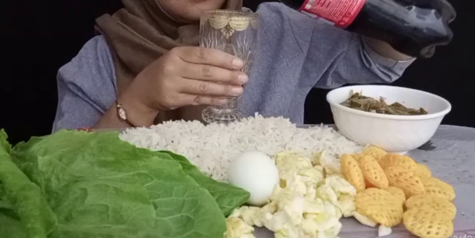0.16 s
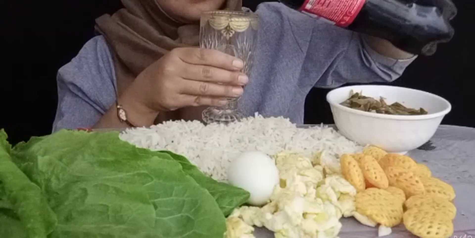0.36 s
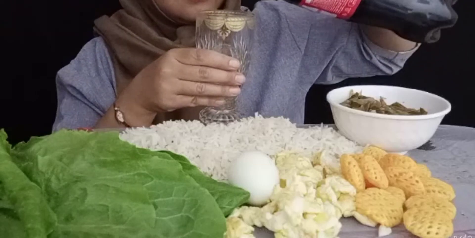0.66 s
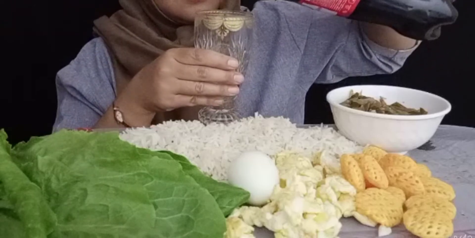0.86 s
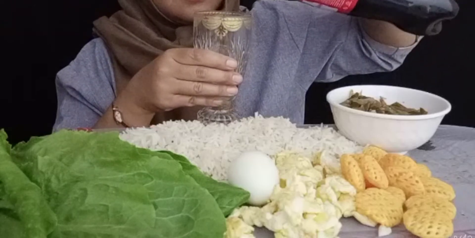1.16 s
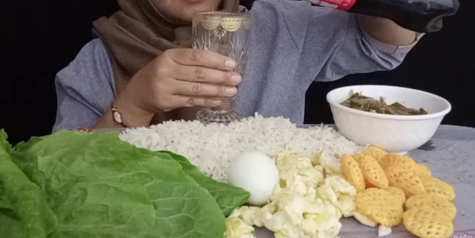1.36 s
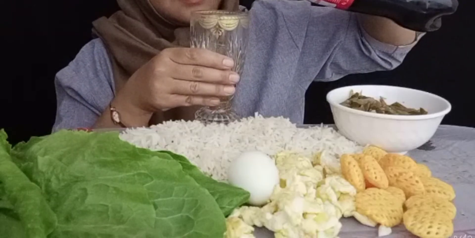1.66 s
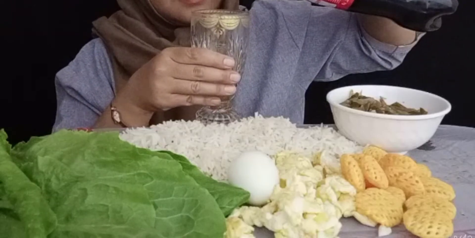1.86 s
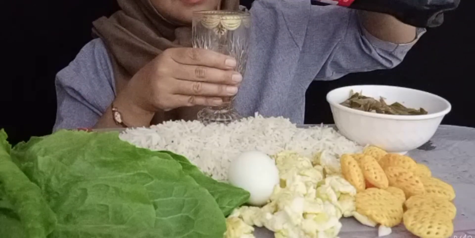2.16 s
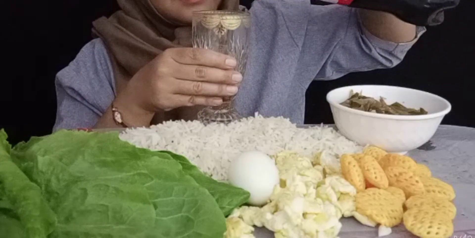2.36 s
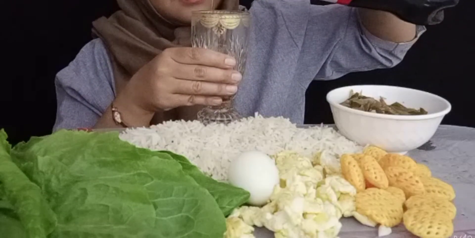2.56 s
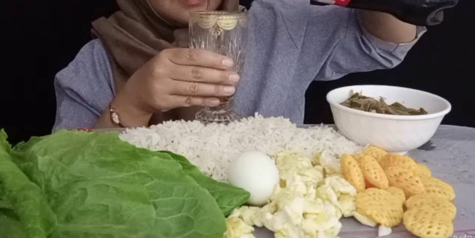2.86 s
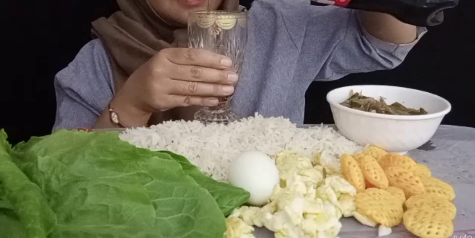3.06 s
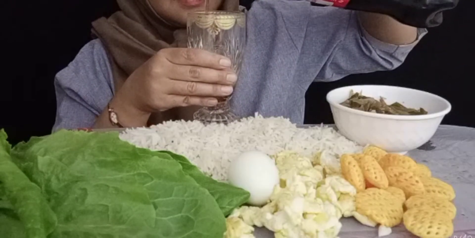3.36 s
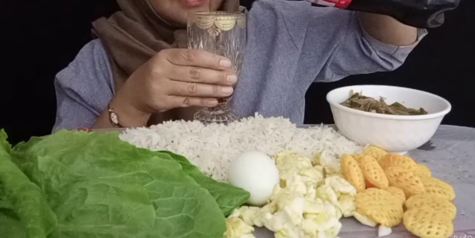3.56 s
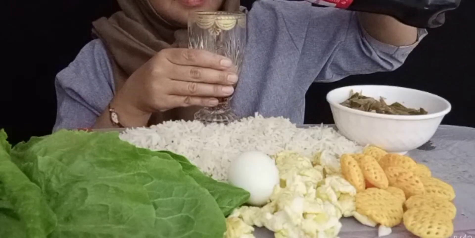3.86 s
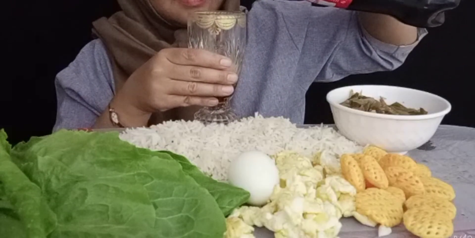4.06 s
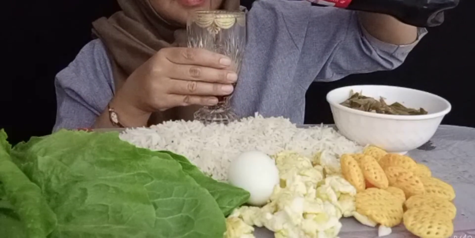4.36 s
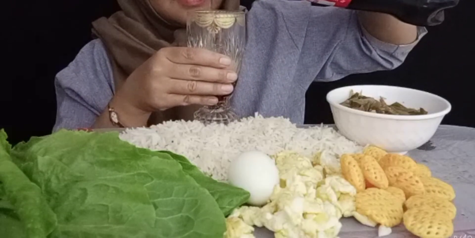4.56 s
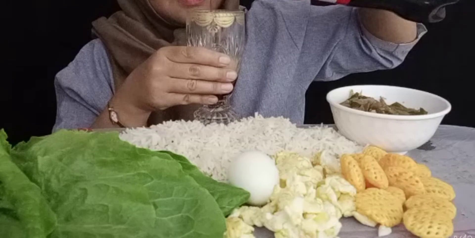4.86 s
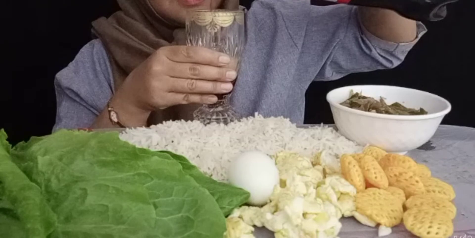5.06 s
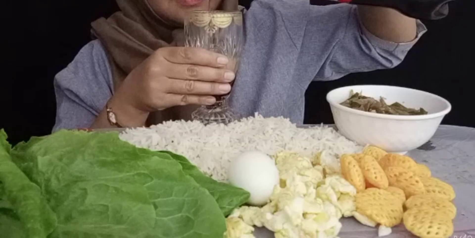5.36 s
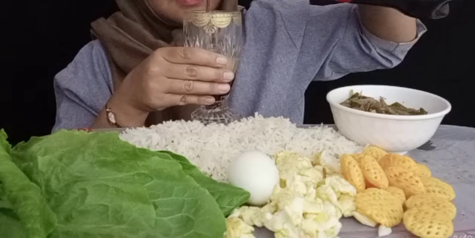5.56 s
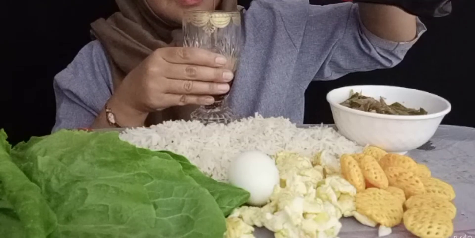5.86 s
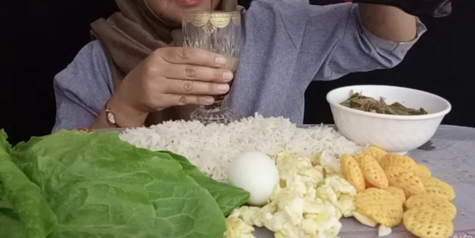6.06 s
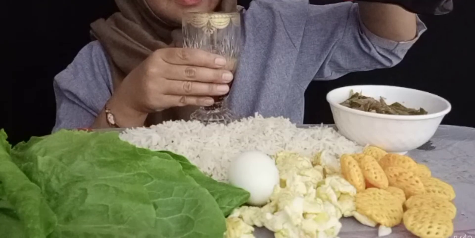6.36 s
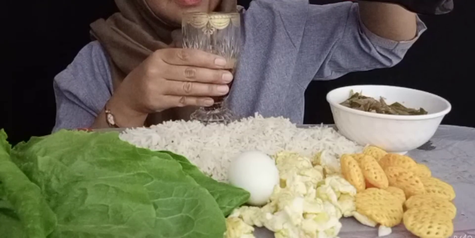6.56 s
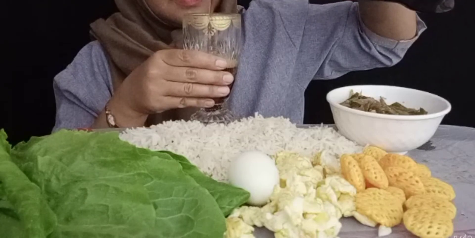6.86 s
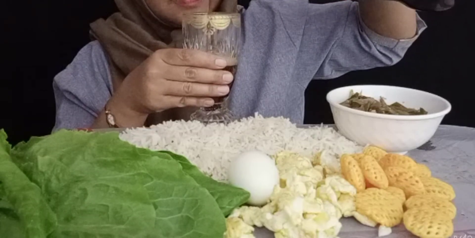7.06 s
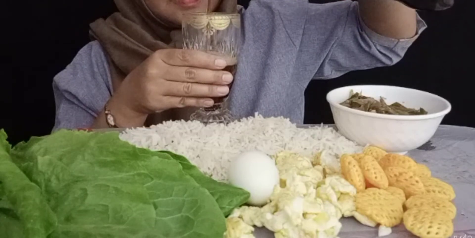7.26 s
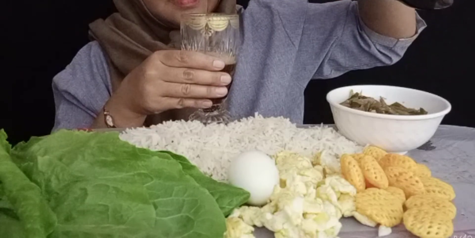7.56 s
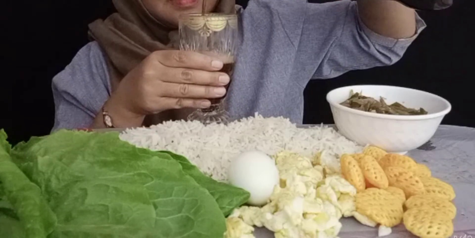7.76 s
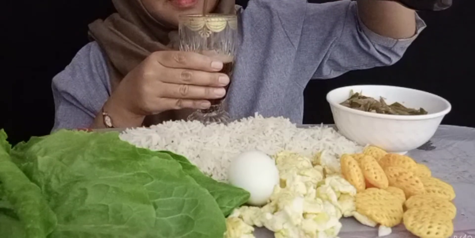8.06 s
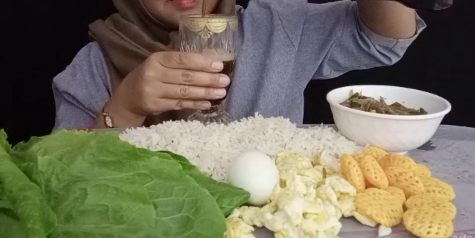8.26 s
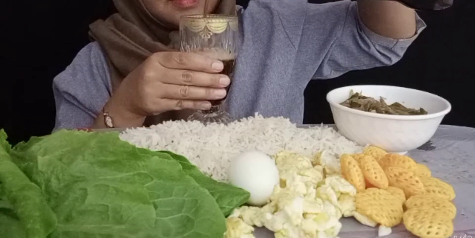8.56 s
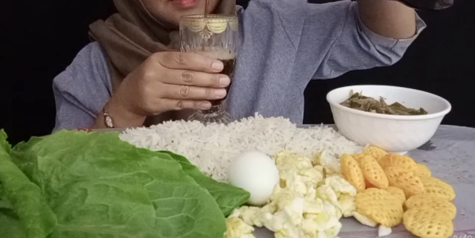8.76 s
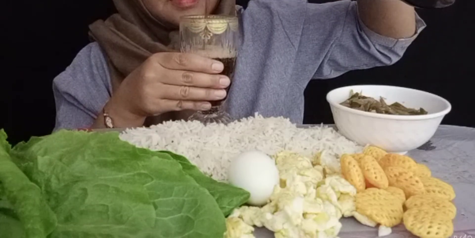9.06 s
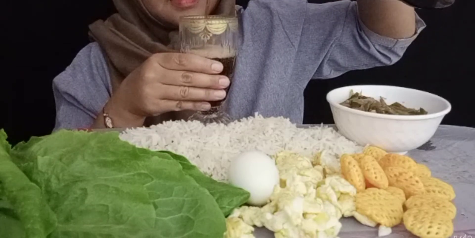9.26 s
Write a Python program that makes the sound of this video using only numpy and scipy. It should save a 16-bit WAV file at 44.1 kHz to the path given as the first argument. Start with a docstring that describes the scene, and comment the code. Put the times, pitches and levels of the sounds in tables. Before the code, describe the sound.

After faint plastic ticks, soda splashes into a tall glass and settles into bright fizzing with soft gulps.

```python
"""A low hum throbs in a small room and a plastic bottle ticks; then a fizzy drink pours into a tall glass.
Drops and slugs of liquid ring the air column, which rises in pitch as the glass fills. The bottle gulps,
the foam fizzes with bursting bubbles, the glass rings faintly and two larger bubbles chirp near the end.
A wall answers each splash and tick. The microphone is close and mono."""
import sys
import numpy as np
from scipy import signal
from scipy.fft import rfft, irfft, next_fast_len
from scipy.io import wavfile
from scipy.ndimage import uniform_filter1d, map_coordinates

SR = 44100
rng = np.random.default_rng(int(sys.argv[2]) if len(sys.argv) > 2 else 0)


def to_wav(s):
    """Save 16-bit WAV."""
    ch = np.atleast_2d(s).T  # columns
    pcm = np.round(np.clip(ch, -1, 1) * 32767)  # PCM
    wavfile.write(sys.argv[1], SR, pcm.astype(np.int16))


N = 415422
TIME_S = np.arange(N) / SR


def amp(db):
    return 10 ** (np.asarray(db) / 20)


def unit(x):
    return x / np.sqrt(np.mean(x ** 2) + 1e-20)


def add_power(*levels_db):
    return 10 * np.log10(sum(amp(db) ** 2 for db in levels_db))


def along(points, hz):
    """Interpolate (Hz, value) points on a log axis."""
    f, v = np.transpose(points)
    return np.interp(np.log(hz + 1), np.log(f + 1), v)


def curves(rows, before=None):
    """One value per sample for each column after the time."""
    s, *cols = np.transpose(rows)
    return [np.interp(TIME_S, s, c, left=before) for c in cols]


def wobble(rate_hz):
    """Smooth random curve, rate_hz knots a second."""
    coarse = np.arange(0, N + 32, 32)
    knots = rng.standard_normal(int(N * rate_hz / SR) + 4)
    return np.interp(np.arange(N), coarse, map_coordinates(knots, [coarse * rate_hz / SR]))


def filtered(x, response):
    """x times a complex response of frequency."""
    m = next_fast_len(N + SR // 2)
    return irfft(rfft(x, m) * response(np.fft.rfftfreq(m, 1 / SR)), m)[..., :N]


def coloured(x, points):
    """x through a (Hz, dB) spectrum, rms 1."""
    return unit(filtered(x, lambda hz: amp(along(points, hz))))


def mode(f, hz, width_hz):
    """Causal resonance, peak 1."""
    return 1j * f * width_hz / (hz * hz - f * f + 1j * f * width_hz + 1e-9)


def pops(rate_hz, spread_db, noise):
    """Random clicks on a share of plain noise, rms 1."""
    chance, polarity, size = rng.random((3, N))
    clicks = (chance < rate_hz / SR) * np.sign(polarity - .5) * amp(-spread_db * np.log(size + 0.17))
    return unit(unit(clicks) + noise * rng.standard_normal(N))


def bursts(rows, shapes):
    """Per level column, the summed dB of all events under that column's envelope."""
    power = np.full((len(shapes), N), 1e-12)
    for s, *levels_db in rows:
        near = slice(max(round(s * SR) - SR // 2, 0), round(s * SR) + SR // 2)
        power[:, near] += [(amp(db) * shape(TIME_S[near] - s)) ** 2
                           for db, shape in zip(levels_db, shapes)]
    return 10 * np.log10(power)


# Hum bands, upper first. Each row: centre in Hz, width in Hz.
HUM_BANDS = [(112.6, 17.5), (84.2, 21)]
# Hum swells. Each row: centre in seconds, upper band in dB, lower band in dB.
THROBS = [(.06, -49, -72), (.31, -47, -63), (.57, -51.5, -66), (1.27, -57, -68), (1.6, -54, -65),
          (2.03, -57, -70), (2.48, -50.5, -56), (3.41, -55.5, -55), (6.32, -56, -71), (6.66, -54, -54.5),
          (7.35, -59, -74), (8.22, -52.5, -64), (8.4, -55, -77), (8.83, -66, -55), (9.4, -67, -54)]


def hum(steady_db=(-64.5, -67), throb_sigma_s=0.043):
    """Two narrow bands of low noise waver and throb."""
    throbs_db = bursts(THROBS, 2 * [lambda t: np.exp(-.5 * (t / throb_sigma_s) ** 2)])
    out = np.zeros(N)
    for (hz, width_hz), db, throb_db in zip(HUM_BANDS, steady_db, throbs_db):
        band = unit(filtered(rng.standard_normal(N), lambda f: mode(f, hz, width_hz) ** 2))
        evened = unit(band / uniform_filter1d(band ** 2, size=SR // 16) ** 0.38)
        out += amp(add_power(db + 3 * wobble(4.6), throb_db)) * evened
    return out


# Room noise spectrum. Each row: frequency in Hz, relative level in dB.
AIR_SPECTRUM = [(60, -32), (150, -21.5), (260, -19.5), (520, -28.5), (1200, -31), (2700, -34),
                (4000, -38.5), (7500, -41), (9000, -49), (13700, -72), (14400, -35), (15800, -56)]


def room_noise(air_db=-64.5, rumble_db=-74.5):
    """Faint steady hiss over a deep rumble."""
    colour = lambda f: amp(along(AIR_SPECTRUM, f)) * np.clip(f / 150, 0, 1) ** 3
    air = unit(filtered(rng.standard_normal(N), colour))
    rumble = coloured(rng.standard_normal(N), [(20, -33), (50, 7), (70, 2), (90, -35)])
    return amp(air_db) * air + amp(rumble_db) * rumble


# Modes of the plastic. Each row: frequency in Hz, width in Hz, gain in dB.
BOTTLE_MODES = [(3540, 690, -0.5), (4330, 690, -3.5), (4780, 730, -2.5), (5580, 500, -6.5),
                (6070, 370, -5.5), (7600, 1300, 1.5), (10700, 2500, -1.5), (14900, 2500, 0)]
# Bottle ticks. Each row: start in seconds, level in dB, centre in Hz, reach in octaves.
TICKS = [(.071, -46, 5500, .15), (0.0752, -38.5, 5230, 0.56), (.085, -43, 6100, 0.33),
         (0.561, -36, 5450, 0.11), (.574, -31.5, 4300, .1), (0.583, -40, 5200, 0.13),
         (8.922, -33, 13500, 0.4)]


def bottle_ticks():
    """Each tick rings the modes of the plastic near its pitch, roughly and briefly."""
    out, t = np.zeros(N), np.arange(SR // 20) / SR
    for s, db, centre_hz, reach_oct in TICKS:
        for hz, width_hz, mode_db in BOTTLE_MODES:
            grit = uniform_filter1d(1 + 0.67 * rng.standard_normal(len(t)), size=25)
            envelope = np.e * np.pi * width_hz * t * np.exp(-np.pi * width_hz * t)
            gain = amp(db + mode_db) * np.exp(-.5 * (np.log2(hz / centre_hz) / reach_oct) ** 2)
            out[round(s * SR):][:len(t)] += gain * envelope * grit * np.sin(2 * np.pi * hz * t)
    return out


WALL_DELAY_S = .0095
# Echo against the direct path, whose treble the rim shades. Each row: frequency in Hz, gain in dB.
WALL_COLOUR = [(300, -5), (1000, -7.5), (2500, 2.5), (7000, 5.5), (15000, -10.5)]


def wall_echo(x, trim_db=-0.9, smear_t60_s=.0008):
    """One strong, bright echo, spread a little by the rough wall."""
    scatter = rng.standard_normal(SR // 200) * amp(-60 * np.arange(SR // 200) / SR / smear_t60_s)
    smeared = signal.fftconvolve(x, scatter / np.linalg.norm(scatter))[:N]
    colour = lambda f: amp(trim_db + along(WALL_COLOUR, f))
    return filtered(smeared, lambda f: colour(f) * np.exp(-2j * np.pi * f * WALL_DELAY_S))


# Room decay. Each row: frequency in Hz, T60 in seconds.
ROOM_T60 = [(300, 0.26), (1000, 0.27), (4000, 0.23), (12000, 0.074)]


def room_tail(x, gap_s):
    """The diffuse tail starts after a gap; each frequency dies at its own speed."""
    hz, t, spectra = signal.stft(rng.standard_normal(SR // 2), SR, nperseg=256)
    decay_db = along(WALL_COLOUR, hz)[:, None] / 2 - 60 * t / along(ROOM_T60, hz)[:, None]
    tail = signal.istft(spectra * amp(decay_db), SR, nperseg=256)[1]
    return signal.fftconvolve(np.pad(x, (round(gap_s * SR), 0)), tail / np.linalg.norm(tail))[:N]


# Steady pour. Each row: time in seconds, burble in dB, spatter in dB, fizz in dB.
POUR = [(.68, -64, -69, -68), (.77, -60, -51, -59), (.87, -79, -63, -56), (1.04, -61, -56.5, -55),
        (1.17, -47, -55, -46), (1.63, -57, -46.5, -51), (1.87, -49, -51, -49), (2.13, -60, -51.5, -49),
        (2.33, -43.5, -47.5, -49), (2.55, -51.5, -51, -47), (3.2, -50.5, -60.5, -48.5),
        (3.82, -58, -64.5, -49), (4.1, -50.5, -67, -49), (4.4, -63, -66.5, -48.5), (4.77, -51, -64, -47.5),
        (5.08, -58, -65, -48.5), (5.8, -52.5, -65, -47), (7.0, -51, -62, -47.5), (8.13, -49, -63, -46),
        (8.8, -55.5, -62, -47), (9.42, -52.5, -64, -49.5)]


def pour_levels(slosh_under_db=11):
    """Burble, spatter, slosh and fizz in dB: the steady pour plus splashes and gulps."""
    burble_db, spatter_db, fizz_db = curves(POUR, before=-120)
    splash_spatter_db, splash_slosh_db, splash_fizz_db = splashes()
    gulp_burble_db, gulp_slosh_db = gulps()
    return (add_power(burble_db, gulp_burble_db),
            add_power(spatter_db, splash_spatter_db),
            add_power(spatter_db - slosh_under_db, splash_slosh_db, gulp_slosh_db),
            add_power(fizz_db, splash_fizz_db))


# Air column, damped more as foam builds. Each row: time in seconds, pitch in Hz, width in Hz.
AIR_COLUMN = [(.7, 856, 94), (2.5, 931, 130), (4.5, 982, 144), (6.5, 1051, 172), (8.3, 1152, 188),
              (8.8, 1240, 170), (9.4, 1315, 190)]
NECK_HZ, NECK_WIDTH_HZ, NECK_DB = 976, 130, -1.1  # steady ring, perhaps the bottle neck
BRIM_HZ, BRIM_WIDTH_HZ, BRIM_DB, BRIM_FADE_IN_S = 1625, 138, -3, (8, 9)  # joins when nearly full


def burble(level_db, wander_s=.35):
    """Small impacts ring the air column, cross-faded between its stages of filling."""
    kicks = pops(rate_hz=150, spread_db=1, noise=0.59) * amp(2.5 * wobble(30))
    filling_s = TIME_S + wander_s * wobble(12)  # the foam heaves
    neck = unit(filtered(kicks, lambda f: mode(f, NECK_HZ, NECK_WIDTH_HZ) * mode(f, NECK_HZ, 155)))
    brim = unit(filtered(kicks, lambda f: mode(f, BRIM_HZ, BRIM_WIDTH_HZ) ** 2))
    out = amp(NECK_DB) * neck + amp(BRIM_DB) * np.interp(TIME_S, BRIM_FADE_IN_S, [0, 1]) * brim
    times_s = [row[0] for row in AIR_COLUMN]
    for stage, (_, hz, width_hz) in zip(np.eye(len(AIR_COLUMN)), AIR_COLUMN):
        # soft impacts leave steep skirts
        ring = filtered(kicks, lambda f: mode(f, hz, width_hz) * mode(f, hz, 544) ** 2)
        out += np.sqrt(np.interp(filling_s, times_s, stage)) * unit(ring)
    running_rms = np.sqrt(uniform_filter1d(out ** 2, size=SR // 8) + 1e-9)
    return out / running_rms * amp(level_db)


# Spatter spectrum. Each row: frequency in Hz, relative level in dB.
SPATTER_SPECTRUM = [(1100, -34), (1500, -9), (2000, -8), (2500, -4.5), (2850, -4.5), (3200, -10),
                    (4200, -8), (6500, -19), (10000, -44), (13000, -85), (15500, -5)]


def spatter(level_db):
    """The stream patters densely on the surface."""
    impacts = pops(rate_hz=990, spread_db=0, noise=0.82)
    return coloured(impacts, SPATTER_SPECTRUM) * amp(level_db + 2.7 * wobble(14))


# Slosh spectrum. Each row: frequency in Hz, relative level in dB.
SLOSH_SPECTRUM = [(150, -16), (290, 5), (360, 8.5), (430, 2), (525, 11), (600, -1), (720, 5.5), (1000, -29)]


def slosh(level_db):
    """The liquid sloshes, low and uneven."""
    slaps = pops(rate_hz=86, spread_db=9.5, noise=0.99)
    return coloured(slaps, SLOSH_SPECTRUM) * amp(level_db + 4.2 * wobble(22))


def bubbles(count, middle_hz, spread, cycles, samples):
    """Single bubbles: soft-starting damped sines that rise in pitch, rms 1."""
    position, smallness = rng.random((2, count, 1))
    hz = np.clip(middle_hz * np.exp(spread * rng.standard_normal((count, 1))), 900, 15000)
    t = np.arange(samples) / SR
    age = hz * t / cycles
    envelope = amp(-3 * np.log(smallness + 0.23)) * np.exp(-age) * (1 - np.exp(-6 * age))
    pings = envelope * np.sin(2 * np.pi * hz * t * (1 + 0.26 * age / cycles))
    index = (position * N).astype(int) + np.arange(samples)
    return unit(np.bincount(index.ravel(), pings.ravel())[:N])


def patches(x, blot_db, streak_db):
    """x under random gains: blots of some 500 Hz by 35 ms, streaks of 170 Hz by 200 ms."""
    spectra = signal.stft(x, nperseg=512)[2]

    def field(bins, frames):
        noise = uniform_filter1d(rng.standard_normal(spectra.shape), size=bins, axis=0)
        return unit(uniform_filter1d(noise, size=frames, axis=1))

    gain_db = blot_db * field(bins=6, frames=6) + streak_db * field(bins=2, frames=34)
    return signal.istft(spectra * amp(gain_db), nperseg=512)[1][:N]


# Fizz spectrum. Each row: frequency in Hz, relative level in dB.
FIZZ_SPECTRUM = [(820, -25), (1400, -22), (1630, -18), (2140, -38), (2730, -47), (2940, -20), (3150, -1.5),
                 (4190, -4.5), (4920, -3.5), (5730, -1), (6410, 6.5), (7540, 5), (11900, -23), (13400, -22),
                 (15800, -4)]
# Colour of the glass. Each row: centre in Hz, width in Hz, gain in dB.
GLASS_COLOUR = [(4140, 94, -9.5), (4870, 1200, 3.5), (5610, 204, -7.5)]
# A ring of the glass that wakes as foam builds. Each row: time in seconds, gain on the hiss in dB.
SHEEN = [(1.5, -10), (3.3, 5), (3.6, 4), (4.4, 3), (6.4, 8), (7.3, 5.5), (8.0, 10), (8.7, 0), (9.2, 9)]
SHEEN_HZ, SHEEN_WIDTH_HZ = 3140, 200


def foam(level_db):
    """Thousands of tiny bubbles burst as a patchy hiss, larger ones ping; the glass colours both."""
    hiss = pops(rate_hz=3300, spread_db=8, noise=1.5)
    pings = amp(-13) * bubbles(count=6000, middle_hz=4496, spread=.6, cycles=17.3, samples=SR // 50)
    sparkle = amp(-12) * bubbles(count=2500, middle_hz=5994, spread=.35, cycles=47.5, samples=SR // 30)
    glass_db = lambda f: sum(db * abs(mode(f, hz, width)) ** 2 for hz, width, db in GLASS_COLOUR)
    fizz = filtered(hiss + pings + sparkle, lambda f: amp(along(FIZZ_SPECTRUM, f) + glass_db(f)))
    sheen = filtered(fizz, lambda f: abs(mode(f, SHEEN_HZ, SHEEN_WIDTH_HZ)) ** 2)
    fizz += (amp(curves(SHEEN)[0] + 3.3 * wobble(5.8)) - 1) * sheen
    patchy = unit(patches(fizz, blot_db=1.1, streak_db=2.24))
    return patchy * amp(level_db + 0.62 * wobble(9) + 0.4 * wobble(40))


# Thin rings of the glass wall. Each row: frequency in Hz, width in Hz, gain in dB.
GLASS_MODES = [(1966, 15, 0.5), (2384, 18, 1), (2760, 16.7, 2.5), (1680, 20, -10)]


def glass_ring(pour, fizz_db, struck_db=1.5, under_fizz_db=23):
    """Splashes and bubbles bursting at its wall set the glass ringing; each ring comes and goes."""
    modes = lambda f: np.array([amp(db) * mode(f, hz, width) for hz, width, db in GLASS_MODES])
    bursting = pops(rate_hz=25, spread_db=10.5, noise=0.12) * amp([5 * wobble(3) for _ in GLASS_MODES])
    taps = unit(filtered(bursting, modes).sum(axis=0)) * amp(fizz_db - under_fizz_db)
    return amp(struck_db) * filtered(pour, lambda f: modes(f).sum(axis=0)) + taps


# Echo between table and microphone stand: delay in seconds, then rows.
# Each row: frequency in Hz, share kept.
FLUTTER = (0.0025, [(800, 0.033), (1200, 0.026), (2500, 0.031), (3400, 0.33), (5000, 0.14), (8000, 0.17)])
# Inverted bounce off something nearer than the wall. Each row: frequency in Hz, share kept.
BOUNCE = [(600, 0.02), (1100, 0.062), (1900, 0.52), (2800, 0.12), (3400, .02)]
# Colour of the path over the table. Each row: centre in Hz, width in Hz, gain in dB.
TABLE_COLOUR = [(760, 160, -5), (1235, 70, 5), (1400, 160, -5), (3560, 150, -5)]


def table_path(x, bounce_s=.00773):
    """A short repeating echo and a single bounce draw combs on the colour of the path."""
    delay_s, kept = FLUTTER

    def response(f):
        comb = 1 / (1 - along(kept, f) * np.exp(-2j * np.pi * f * delay_s))
        bounce = 1 - along(BOUNCE, f) * np.exp(-2j * np.pi * f * bounce_s)
        bells = [1 + (amp(db) - 1) * mode(f, hz, width) for hz, width, db in TABLE_COLOUR]
        return comb * bounce * np.prod(bells, axis=0)

    return filtered(x, response)


def splash_shape(rise_s, t60_s):
    """Quick rise, even fall, peak 1."""
    raw = lambda t: (1 - np.exp(-t / rise_s)) * amp(-60 * t / t60_s)
    peak = raw(np.arange(SR // 4) / SR).max()
    return lambda t: raw(np.maximum(t, 0)) / peak


# Splashes. Each row: start in seconds, then peak spatter, slosh and fizz in dB.
SPLASHES = [(.69, -57, -82, -48.5), (.803, -38.5, -56.5, -68), (.875, -45, -75.5, -48),
            (.943, -50.5, -64, -62), (1.085, -39.5, -44, -29.5), (1.19, -41, -43, -51),
            (1.29, -37, -56, -45), (1.36, -64, -53, -44), (1.405, -50, -42.5, -40), (1.448, -48, -44, -38),
            (1.585, -47, -42, -64), (1.84, -48, -53, -48.5), (1.942, -39, -57, -47.5),
            (2.015, -44, -45, -63), (2.195, -39, -52, -44), (2.31, -54, -45, -52), (2.432, -41.5, -50, -47),
            (2.74, -61, -61, -44), (2.96, -53, -77, -44), (3.335, -47.5, -63, -41.5), (4.15, -53, -65, -49),
            (6.085, -51, -66, -50), (6.15, -51, -56, -56), (6.6, -50.5, -64, -58), (8.12, -48, -58, -59)]


def splashes(rise_s=(.007, .025, .014), t60_s=(0.099, 0.19, 0.19)):
    """Slugs of liquid land: spatter, slosh and fizz in dB."""
    return bursts(SPLASHES, [splash_shape(*pair) for pair in zip(rise_s, t60_s)])


# Foam softens the landing. Each row: time in seconds, attack in seconds.
DROP_ATTACK = [(.7, .0008), (2.5, .001), (4, .0018)]
# Crack spectrum. Each row: frequency in Hz, gain in dB.
CRACK_SPECTRUM = [(600, -18), (1500, -4), (2600, 2.5), (4500, -15), (6800, -6.5), (10000, -16.5),
                  (13000, -32), (15500, -42)]
# Big drops. Each row: start in seconds, level in dB, ring in Hz, crack offset in dB.
DROPS = [(0.714, -34, 890, -13), (0.733, -34, 865, -17), (0.762, -13, 860, -16), (0.804, -7.5, 856, -15.5),
         (0.836, -18.5, 786, -28), (0.874, -43.5, 850, 14.5), (0.944, -27.5, 840, 5),
         (0.987, -29.5, 826, -12), (1.051, -25, 830, -4), (1.071, -27, 860, -10), (1.087, -23.5, 925, 15),
         (1.119, -17, 855, -10), (1.166, -26, 840, -2), (1.189, -20, 850, -2), (1.204, -17.5, 858, 0.5),
         (1.236, -20.5, 857, -21), (1.356, -27.5, 940, 4), (1.4, -27, 935, 0), (1.417, -9.5, 885, -6),
         (1.447, -20, 886, 0), (1.477, -27, 910, 2), (1.486, -25, 920, -16), (1.496, -16, 890, -9.5),
         (1.517, -25, 916, -2), (1.531, -18.5, 897, -6.5), (1.553, -36, 905, -10), (1.566, -27.5, 870, 0.5),
         (1.595, -18, 926, -16), (1.608, -20.5, 880, -19), (1.632, -20, 900, -25), (1.666, -34, 905, -18),
         (1.685, -15, 900, -16), (1.7, -22.5, 907, -5), (1.724, -22.5, 890, -7), (1.759, -19.5, 896, -27),
         (1.779, -34, 910, -18), (1.841, -25, 900, -22), (1.854, -26.5, 876, -21), (1.942, -26.5, 930, 2),
         (1.973, -20.5, 920, -21), (1.996, -27, 920, -8), (2.01, -18, 900, -15), (2.038, -19.5, 928, -22),
         (2.066, -28, 850, 0), (2.089, -25.5, 880, -14), (2.17, -27, 937, -6), (2.196, -33, 940, 6),
         (2.224, -16.5, 918, -27), (2.288, -23, 877, -11), (2.297, -27, 900, -18), (2.316, -20, 928, -14),
         (2.326, -23, 924, -10), (2.387, -24.5, 950, -8), (2.399, -19, 923, -5), (2.434, -23, 924, 0.5),
         (2.556, -24, 944, -11), (2.747, -30.5, 920, -14), (2.778, -28, 935, -3), (2.977, -27, 985, -16),
         (3.133, -29.5, 996, -16), (3.338, -30, 965, -19), (3.352, -26, 980, -19), (3.363, -27.5, 960, -16),
         (3.434, -30.5, 1000, -22), (3.568, -29.5, 986, -24), (4.143, -28, 980, -25),
         (4.184, -27.5, 923, -21), (4.463, -30, 1010, -21), (4.603, -29.5, 980, -13),
         (4.638, -33.5, 1045, -26), (4.712, -33, 960, -20), (4.727, -33.5, 1060, -20),
         (4.741, -36, 1070, -23), (4.81, -31.5, 950, -20), (5.644, -33, 940, -6), (6.08, -32, 980, -2),
         (6.106, -27.5, 925, -10), (6.157, -28.5, 990, -14), (6.174, -29, 886, -23),
         (6.252, -35.5, 960, -15), (6.718, -31.5, 1010, -11), (7.53, -26.5, 1055, -7),
         (7.61, -34, 1030, -9), (7.693, -31.5, 1025, -24), (7.928, -32.5, 1010, -18),
         (8.122, -30, 1024, -21), (8.131, -35, 1155, -20), (8.138, -38, 1030, -6), (8.612, -36, 1120, -14),
         (8.979, -39.5, 1140, -18)]


def drops(rise_per_10ms=0.072, roughness=0.35, damping_share=0.44, cavity_s=0.0089, crack_t60_s=0.0099):
    """Each big drop cracks on the surface and rings the column some ten cycles, till its cavity closes."""
    rings, cracks, t = np.zeros(N), np.zeros(N), np.arange(SR // 16) / SR
    times_s, _, widths_hz = np.transpose(AIR_COLUMN)
    for s, db, hz, crack_db in DROPS:
        grit = rng.standard_normal(len(t))
        rough = 1 + roughness * unit(uniform_filter1d(grit[::-1], size=150)) * np.minimum(t / 0.0065, 1)
        width_hz = damping_share * np.interp(s, times_s, widths_hz)
        attack = (1 - np.exp(-t / np.interp(s, *np.transpose(DROP_ATTACK)))) ** 2
        envelope = attack * np.exp(-np.pi * width_hz * t - (t / cavity_s) ** 2)
        tone = np.sin(2 * np.pi * hz * t * (1 + rise_per_10ms * (np.minimum(50 * t, 1) - .5)))
        rings[round(s * SR):][:len(t)] += amp(db) * envelope / envelope.max() * rough * tone
        cracks[round(s * SR):][:len(t)] += amp(db + crack_db - 60 * t / crack_t60_s) * grit
    highpass = lambda f: (1j * f / (420 + 1j * f)) ** 2
    return filtered(rings, highpass) + filtered(cracks, lambda f: amp(along(CRACK_SPECTRUM, f)))


# Gulps. Each row: centre in seconds, half length in seconds, burble in dB, slosh in dB.
GULPS = [(2.754, 0.11, -49, -68), (2.983, 0.024, -45, -80), (3.364, 0.028, -42, -55),
         (3.552, 0.032, -49, -83), (3.717, 0.03, -44, -60.5), (4.177, 0.05, -46.5, -53),
         (4.451, 0.037, -46, -65), (4.637, .035, -48.5, -61), (4.725, 0.026, -47, -62),
         (4.8, 0.04, -52, -60.5), (5.163, 0.022, -48, -61), (5.388, 0.062, -49.5, -67),
         (5.64, 0.057, -52, -64), (5.804, 0.075, -51.5, -67.5), (6.132, 0.051, -42.5, -54.5),
         (6.45, 0.033, -48, -78), (7.015, 0.023, -46.5, -75), (7.544, 0.018, -41.5, -79),
         (8.024, 0.035, -48.5, -75), (8.141, 0.014, -46, -52)]


def gulps():
    """The bottle gulps air and the stream swells: burble and slosh in dB."""
    power = np.full((2, N), 1e-12)
    for s, half_s, *levels_db in GULPS:
        near = slice(round(s * SR) - SR // 2, round(s * SR) + SR // 2)
        power[:, near] += amp(levels_db)[:, None] ** 2 * np.exp(-((TIME_S[near] - s) / half_s) ** 2)
    return 10 * np.log10(power)


# Larger bubbles. Each row: start in seconds, level in dB, starting pitch in Hz.
CHIRPS = [(8.027, -56, 1495), (8.27, -53, 1403)]


def chirps(length_s=.05, rise_share=0.17):
    """Larger bubbles chirp upward, soft and unsteady, as they near the surface."""
    out, progress = np.zeros(N), np.linspace(0, 1, round(length_s * SR))
    for s, db, hz in CHIRPS:
        grit = unit(uniform_filter1d(rng.standard_normal(len(progress)), size=120))
        envelope = np.sin(np.pi * progress) * (1 + 1.8 * grit)
        tone = np.sin(2 * np.pi * hz * length_s * progress * (1 + rise_share * progress / 2))
        out[round(s * SR):][:len(tone)] += amp(db) * envelope * tone
    return out


def scene():
    """Pour and bottle with their echoes, over the hum and room noise."""
    burble_db, spatter_db, slosh_db, fizz_db = pour_levels()
    pour = spatter(spatter_db) + slosh(slosh_db) + burble(burble_db) + drops() + chirps()
    ticks = bottle_ticks()
    ring = glass_ring(pour, fizz_db)
    echoes = wall_echo(pour) + amp(-9) * room_tail(pour, gap_s=WALL_DELAY_S)
    glass = table_path(pour + ring + echoes + foam(fizz_db))
    bottle = ticks + amp(-3) * wall_echo(ticks) + amp(2) * room_tail(ticks, gap_s=0.0011)
    mono = glass + bottle + room_noise() + hum()
    return np.array([mono, mono])


def record(dry):
    """Brick-wall low-pass."""
    return filtered(dry, lambda hz: hz < 15780)


dry = scene()
out = record(dry)
to_wav(out)
```